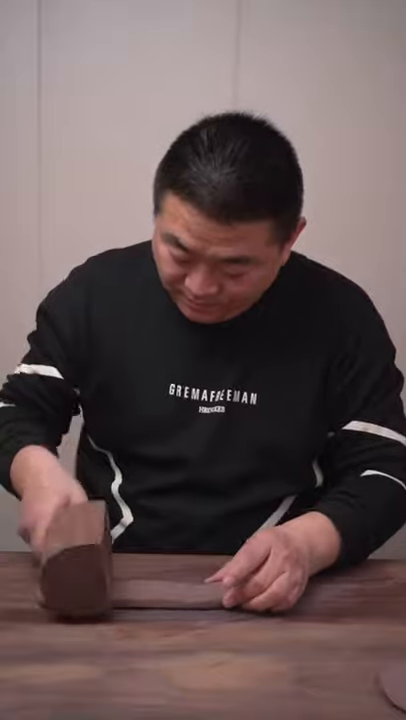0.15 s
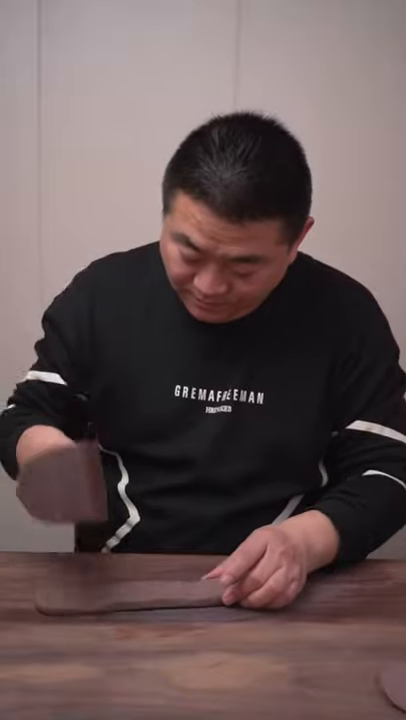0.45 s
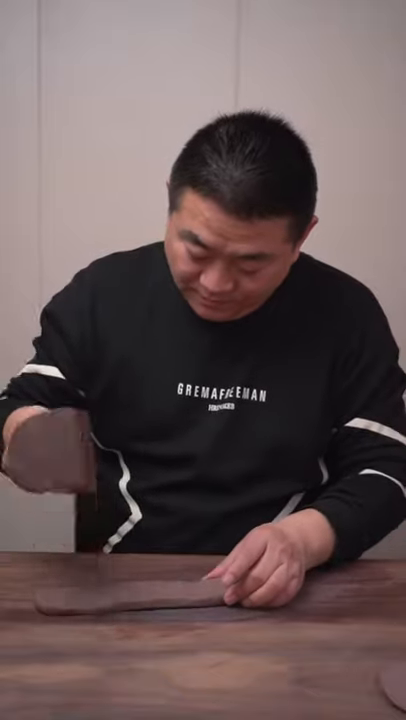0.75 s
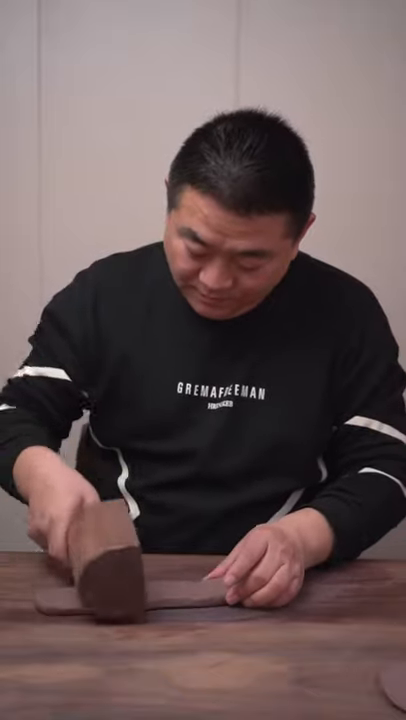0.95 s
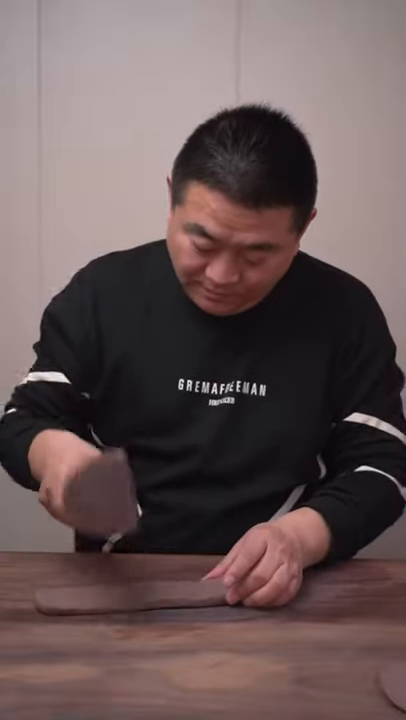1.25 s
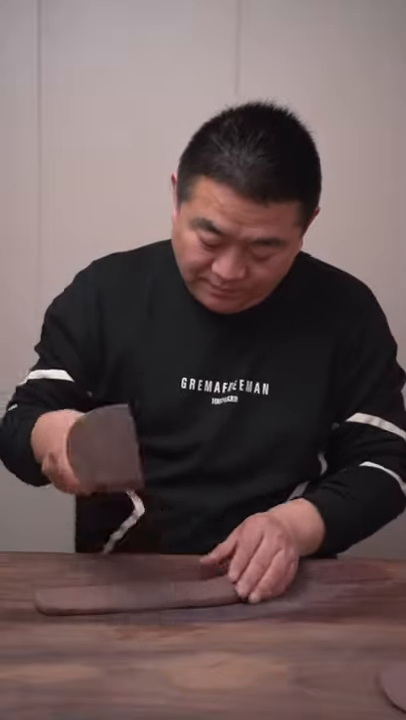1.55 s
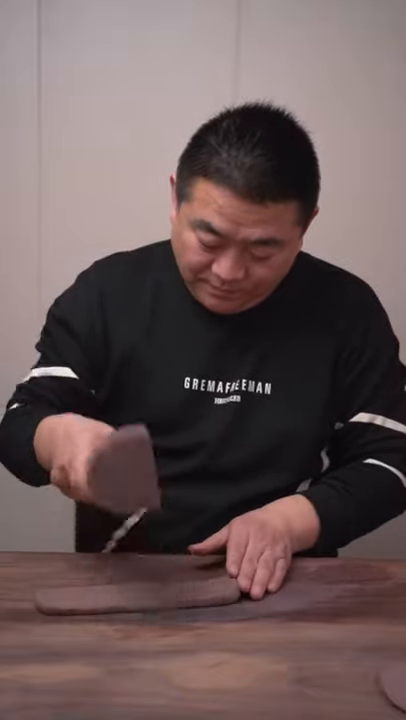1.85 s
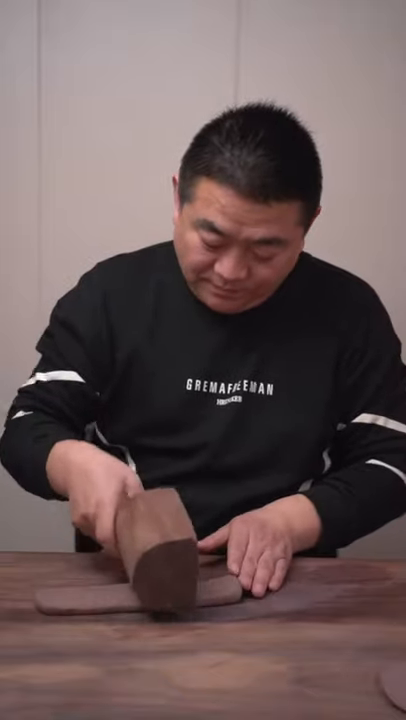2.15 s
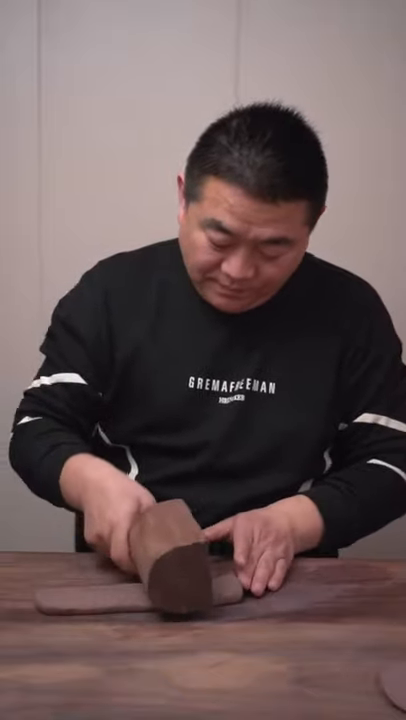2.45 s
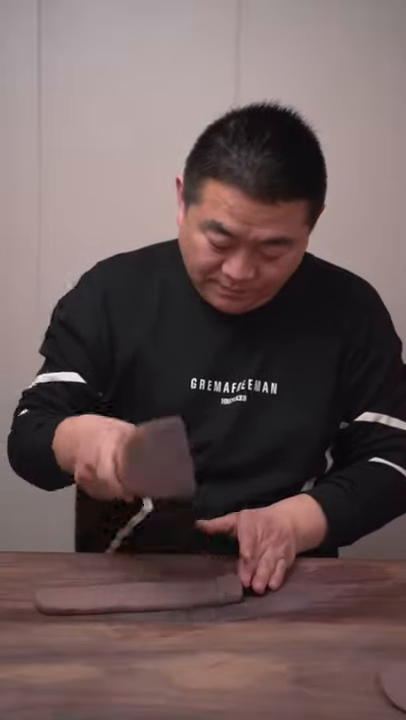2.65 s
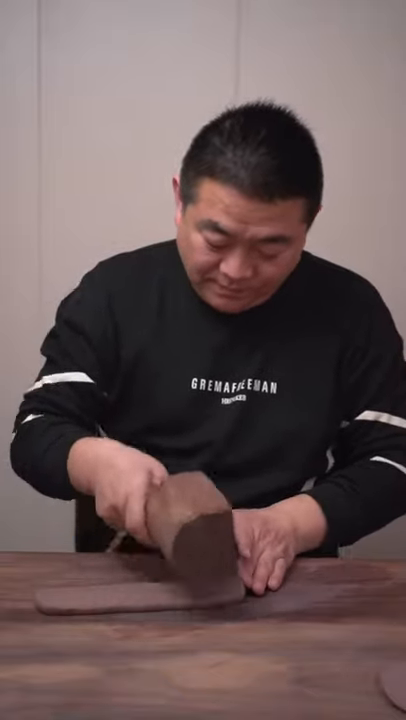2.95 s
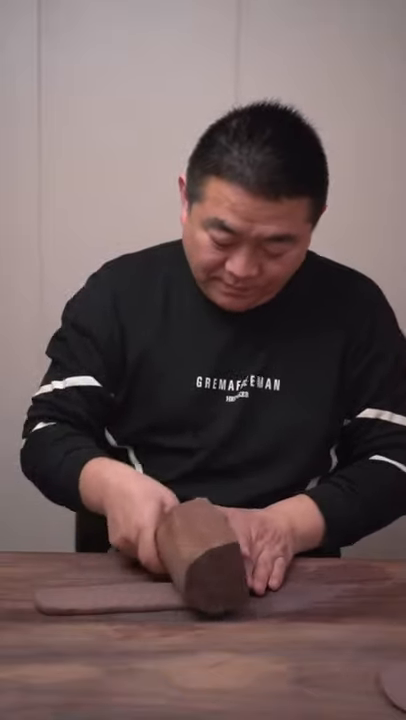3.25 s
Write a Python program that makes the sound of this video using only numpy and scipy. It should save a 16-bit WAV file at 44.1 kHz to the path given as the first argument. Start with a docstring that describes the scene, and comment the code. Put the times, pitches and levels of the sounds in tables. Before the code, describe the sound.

Mallet blows on a clay slab: short woody knocks with damp slaps, evenly spaced, echoing in a bare room

```python
"""A damp slap and a short wooden knock open the scene: a mallet beats clay flat on a heavy table.
Nine even blows land in a bare, live room; one light tap follows the first. Everything sits to the left.
Table and mallet modes make the knock, and short filtered noise makes the slap.
Delayed copies are the wall echoes, decaying noise the room tail, low modes the boom.
A thin, fluttering high tone rings along, over a faint, dull rush of air."""
import sys
import numpy as np
from scipy import signal
from scipy.fft import rfft, irfft, next_fast_len
from scipy.io import wavfile
from scipy.ndimage import map_coordinates

SR = 44100
rng = np.random.default_rng(int(sys.argv[2]) if len(sys.argv) > 2 else 0)


def master(y):
    """Save y as 16-bit WAV."""
    cut = np.clip(np.atleast_2d(y).T, -1, 1)
    pcm = np.round(cut * 32767)  # scale
    wavfile.write(sys.argv[1], SR, pcm.astype(np.int16))


N = 149940
t = np.arange(SR) / SR  # the one-second time axis of each single sound


def amp(db):
    """Decibels to gain."""
    return 10 ** (np.asarray(db) / 20)


def along(points, hz):
    """Read (frequency, value) points on a log frequency axis."""
    point_hz, value = np.transpose(points)
    return np.interp(np.log(hz + 1), np.log(point_hz + 1), value)


def colour(x, gain):
    """Minimum-phase filter with the given gain over frequency: its response never precedes the sound."""
    size = 2 * next_fast_len(len(x))
    gains = np.maximum(gain(np.fft.rfftfreq(size, 1 / SR)), 1e-6)
    cepstrum = irfft(np.log(gains), size)
    # folding the cepstrum forward makes the filter causal
    cepstrum[1:size // 2] *= 2
    cepstrum[size // 2 + 1:] = 0
    response = np.exp(rfft(cepstrum))
    return irfft(rfft(x, size) * response, size)[:len(x)]


def shaped(x, spectrum):
    """Give unit white noise a spectrum in dB per Hz."""
    return colour(x, lambda hz: amp(along(spectrum, hz)) * np.sqrt(SR / 2))


def fade(t60_s):
    """Exponential decay that falls 60 dB in t60_s."""
    return np.exp(-np.log(1000) * t / t60_s)


def swell(build_s):
    """Exponential rise towards full level."""
    return 1 - np.exp(-t / build_s)


def ringing(modes, build_s):
    """Damped sine modes that swell in together."""
    tones = sum(amp(db) * fade(t60_s) * np.sin(2 * np.pi * hz * t) for hz, db, t60_s in modes)
    return tones * swell(build_s)


def add(track, start_s, sound):
    """Mix a sound into the track at start_s."""
    part = track[round(start_s * SR):][:len(sound)]
    part += sound[:len(part)]


# mallet blows: start_s, level_db (whole blow), slap_db, sizzle_db (treble shelf), ring_db,
# slowness (ratio that stretches the contact)
MALLET_BLOWS = [(0.1353, -0.5, -0.5, -5.5, -6, 1.004), (0.5225, -.5, -7, -1, -6, 0.98),
                (0.9068, 0, -2, 0, -6, 1.03), (1.3048, -1, 0.5, 0.5, 7, 1.07),
                (1.6882, 0, -1, 0.5, -3, 1.03), (2.0787, 0, -3.5, -7.5, 2, 1.038),
                (2.4614, 1, 0.5, -0.5, 2, 1.003), (2.8431, 0.5, 0, 2, 2, 1.026),
                (3.2201, -1, 0, -2.5, 6, 1.014)]


def mallet():
    """Each blow knocks, booms and slaps; the slap varies with how flat the face meets the clay."""
    track, modes = np.zeros(N), boom()
    steady = colour(diffuse(), steady_gain)  # the same low tail serves every blow
    for start_s, level_db, slap_db, sizzle_db, ring_db, slowness in MALLET_BLOWS:
        noise = slap(slap_db) + room_tail(steady, slap_db)
        noise = sizzle(noise, sizzle_db)
        blow = knock(slowness) + modes + noise + amp(ring_db) * ping()
        add(track, start_s, amp(level_db) * blow)
    return track


# table-top modes, damped by the clay: pitch_hz (before division by slowness), level_db
TABLE_MODES = [(199, -32.5), (327, -22.5), (362, -17.5)]
# pushes of the mallet on the table: delay_s, level_db, length_s (times before stretching by slowness)
CONTACT_PUSHES = [(0, -4.5, .0033), (.0039, -.6, .0068)]
# the mallet's wooden head: pitch_hz, level_db, t60_s
MALLET_MODES = [(875.6, -29, 0.076), (1001, -28, 0.026), (1330, -39, 0.058), (1960, -33, 0.022),
                (3010, -45, 0.032)]
MALLET_BUILD_S = 0.0025
# distinct wall echoes of the knock: delay_s, level_db
WALL_ECHOES = [(.013, -15.9), (.0275, -9.2), (.0342, -13.4), (.0558, -22), (.0787, -20), (.0981, -18),
               (.1409, -25), (.2025, -27), (.2155, -31)]


def knock(slowness):
    """The table sounds only while the mallet presses, lower where thick clay slows it; walls echo it."""
    top = sum(amp(db) * np.sin(2 * np.pi * hz * t / slowness) for hz, db in TABLE_MODES)
    direct = ringing(MALLET_MODES, MALLET_BUILD_S)
    for delay_s, level_db, length_s in CONTACT_PUSHES:
        progress = np.minimum(t / (length_s * slowness), 1)
        force = np.sqrt(np.abs(np.sin(np.pi * progress)))
        add(direct, delay_s * slowness, -amp(level_db) * force * top)
    sound = direct.copy()
    for delay_s, level_db in WALL_ECHOES:
        add(sound, delay_s, amp(level_db) * direct)
    return sound


# slap spectrum: frequency_hz, level_db_per_hz (before each blow's own levels)
SLAP_SPECTRUM = [(100, -113), (600, -73), (1400, -63.5), (2200, -67.5), (3000, -64), (4400, -68),
                 (5400, -80.5), (7500, -80), (10000, -85.5), (13000, -85), (16000, -98)]
SLAP_T60_S = 0.0093
SQUELCH_DB, SQUELCH_T60_S = -14.5, 0.082  # the longer, softer part of the contact


def slap(slap_db):
    """The face meets damp clay: a noise burst with a sharp decay and a softer squelch behind it."""
    contact = fade(SLAP_T60_S) + amp(SQUELCH_DB) * fade(SQUELCH_T60_S)
    return amp(slap_db) * shaped(rng.standard_normal(SR) * contact, SLAP_SPECTRUM)


def sizzle(noise, sizzle_db):
    """Tilt the treble of slap and tail by a shelf that reaches half its decibels at 5150 Hz."""
    return colour(noise, lambda hz: amp(sizzle_db * (1 - 1 / (1 + (hz / 5150) ** 6))))


# low standing waves of room and table: pitch_hz, level_db, t60_s
STANDING_WAVES = [(61.9, -57, 0.72), (74.5, -47, 0.59), (112.7, -38, 0.43), (119.5, -33, 0.3),
                  (150.7, -36, 0.43), (159.1, -35, 0.34), (214.5, -39, 0.41), (226.9, -36, 0.45),
                  (251.0, -37, 0.42), (260.7, -38, 0.7), (293.7, -31, 0.23), (309.4, -36, 0.48),
                  (328.2, -43, 0.56), (349.8, -44, 0.44), (356.1, -31, 0.4), (385.9, -42, 0.46),
                  (407.7, -40, 0.51), (423.7, -45, 0.4), (439.3, -36, 0.51), (465.4, -45, 0.37),
                  (548.4, -54, 0.44)]
# faint higher modes of the table: pitch_hz, level_db, t60_s
TABLE_OVERTONES = [(721.3, -49, 0.63), (821, -49.5, 0.33), (1200, -57, 0.45), (1530, -50.5, 0.37),
                   (2706, -58, 0.47)]
BOOM_BUILD_S, OVERTONE_BUILD_S = 0.0017, 0.002


def boom():
    """Room and table ring on after any knock as damped modes."""
    return ringing(STANDING_WAVES, BOOM_BUILD_S) + ringing(TABLE_OVERTONES, OVERTONE_BUILD_S)


RING_HZ, RING_DB, RING_T60_S, RING_BUILD_S = 7510, -62, 0.28, 0.008  # level before each blow's ring_db
FLUTTER_RATE_HZ, FLUTTER_DB, SMEAR_RAD = 70, 4, 0.8  # random points per second; depths per unit of noise


def ping():
    """A small hard object is jolted into a thin ring, which the room makes flutter and smear."""
    noise = rng.standard_normal((2, SR // 64))
    # slow random curves: one moves the level, the other the phase
    flutter, smear = (map_coordinates(row, [t * FLUTTER_RATE_HZ]) for row in noise)
    tone = np.sin(2 * np.pi * RING_HZ * t + SMEAR_RAD * smear)
    level = amp(RING_DB + FLUTTER_DB * flutter)
    return level * tone * fade(RING_T60_S) * swell(RING_BUILD_S)


# decay of the diffuse room: frequency_hz, t60_s
ROOM_DECAY = [(80, 0.57), (350, 0.62), (1000, 0.48), (3500, 0.47), (6500, 0.34), (12000, 0.23)]
TAIL_BUILD_S = 0.002


def diffuse():
    """Even white noise dies away band by band as the room does, the high treble soonest."""
    _, frame_s, bins = None, *signal.stft(rng.standard_normal(SR), SR, nperseg=256)[1:]
    bin_hz = np.fft.rfftfreq(256, 1 / SR)
    decay = np.exp(-np.log(1000) * frame_s / along(ROOM_DECAY, bin_hz)[:, None])
    return signal.istft(bins * decay, SR)[1][:SR] * swell(TAIL_BUILD_S)


def steady_gain(hz):
    """Low-pass gain, 3 dB down at 1090 Hz, for the part of the tail that every blow shares."""
    return 1 / np.sqrt(1 + (hz / 1090) ** 4)


# diffuse room tail: frequency_hz, level_db_per_hz (before decay and each blow's own levels)
TAIL_SPECTRUM = [(30, -97), (70, -95.5), (125, -84), (195, -63.5), (290, -61), (450, -67), (560, -70),
                 (850, -66.5), (1400, -72.5), (2300, -81.5), (4500, -84.5), (5500, -94), (7600, -95),
                 (12000, -100), (16000, -106)]
SLAP_INTO_ROOM = 0.56  # share of slap_db that also moves the upper tail


def room_tail(steady, slap_db):
    """The room answers with a shared low tail and a fresh upper tail that partly follows the slap."""
    upper = colour(diffuse(), lambda hz: np.sqrt(1 - steady_gain(hz) ** 2))
    fresh = amp(SLAP_INTO_ROOM * slap_db) * upper
    return shaped(steady + fresh, TAIL_SPECTRUM)


# light tap: frequency_hz, level_db_per_hz (before TAP_DB)
TAP_SPECTRUM = [(100, -83), (500, -72), (1000, -61.5), (2500, -76), (3500, -83), (6000, -98.5),
                (14000, -110)]
TAP_START_S, TAP_T60_S = 0.3105, 0.019
TAP_DB, TAP_ROOM_DB, TAP_KNOCK_DB = -3, -17, -25  # noise, room share within that noise, knock and boom


def tap():
    """One light, dry tap on the table: a short noise burst, a faint knock and the room's answer."""
    track = np.zeros(N)
    burst = rng.standard_normal(SR) * fade(TAP_T60_S) + amp(TAP_ROOM_DB) * diffuse()
    body = knock(0.85) + boom()  # quicker contact than any blow
    add(track, TAP_START_S, amp(TAP_DB) * shaped(burst, TAP_SPECTRUM) + amp(TAP_KNOCK_DB) * body)
    return track


# rush of air: frequency_hz, relative_level_db_per_hz (the whole is levelled afterwards)
AIR_SPECTRUM = [(25, -22), (65, -8.5), (130, -11.5), (290, 0.5), (460, -4), (560, -12), (760, -14),
                (1450, -18), (1750, -30), (2500, -33.5), (3000, -32.5), (4400, -36.5), (5500, -45),
                (11000, -47.5), (15000, -65)]


def room_tone():
    """A faint, dull rush of air in the room: filtered noise at a steady level."""
    air = shaped(rng.standard_normal(N), AIR_SPECTRUM)
    return amp(-63) * air / air.std()


def scene():
    """One signal feeds both channels, 9.2 dB louder on the left."""
    pan = amp([[9.2 / 2], [-9.2 / 2]])
    return pan / pan.mean() * (mallet() + tap() + room_tone())


def record(dry):
    """The recorder drops the bass below 25 Hz and cuts steeply above 15.8 kHz."""
    low_cut = signal.butter(2, 25, "high", fs=SR, output="sos")
    band_limit = signal.ellip(10, 0.1, 90, 15800, fs=SR, output="sos")
    return signal.sosfilt(band_limit, signal.sosfilt(low_cut, dry))


dry = scene()
out = record(dry)
master(out)
```